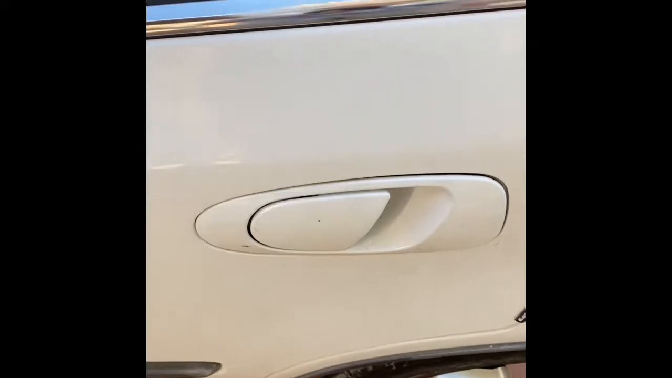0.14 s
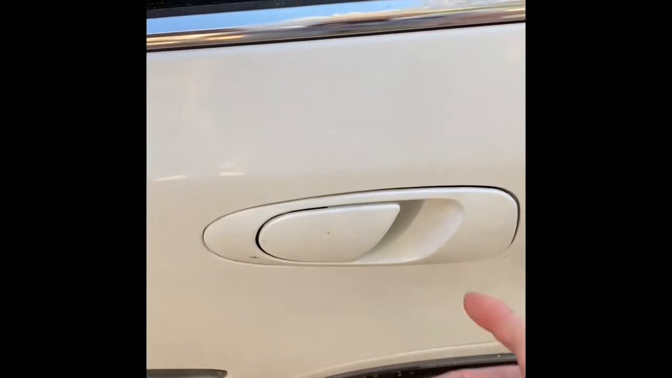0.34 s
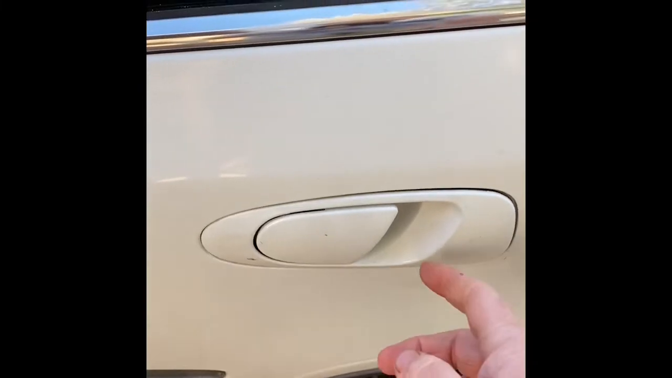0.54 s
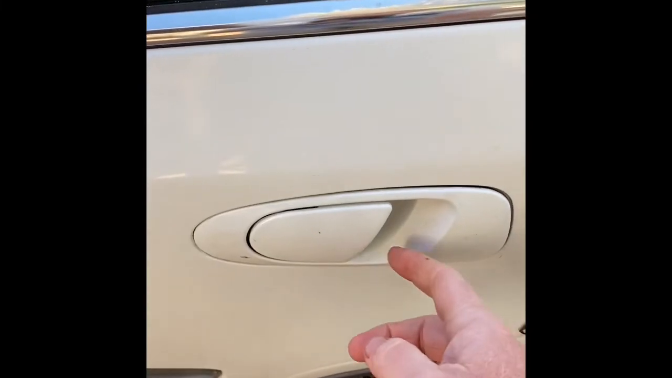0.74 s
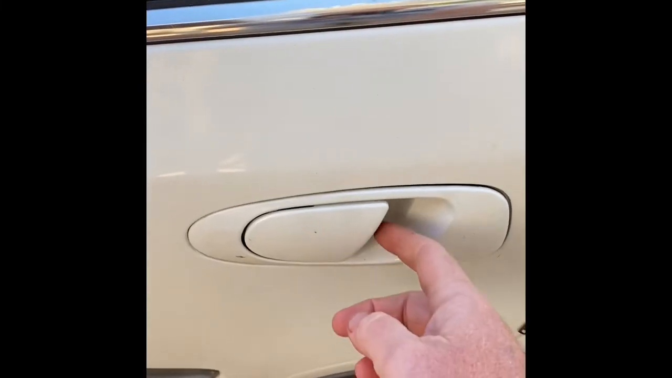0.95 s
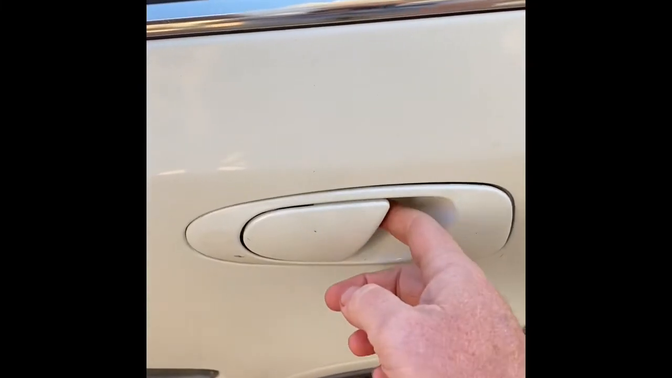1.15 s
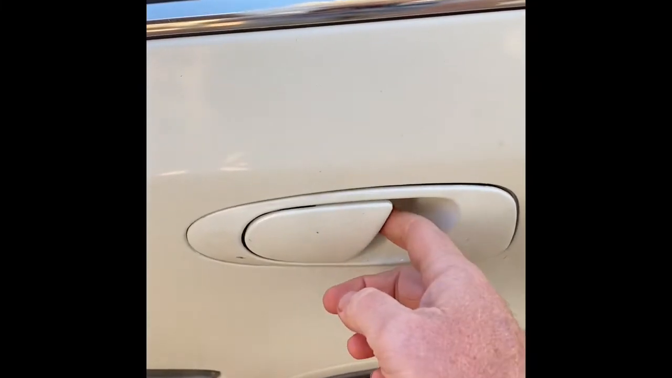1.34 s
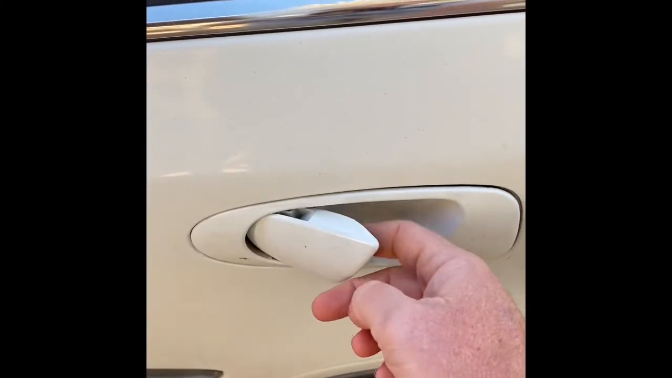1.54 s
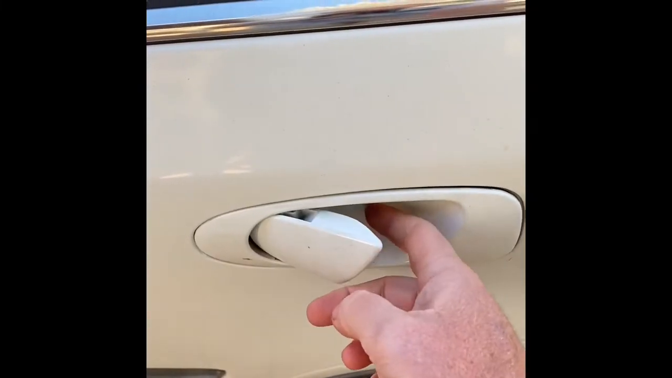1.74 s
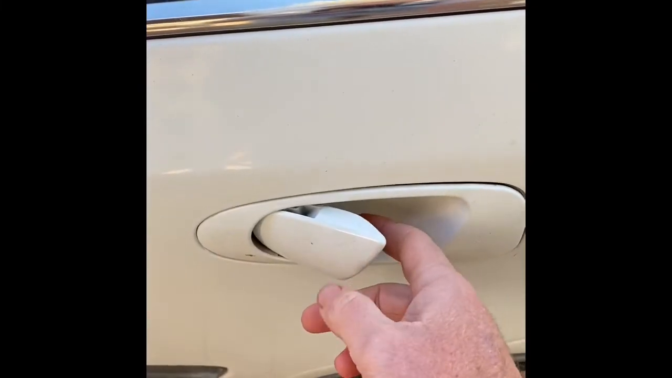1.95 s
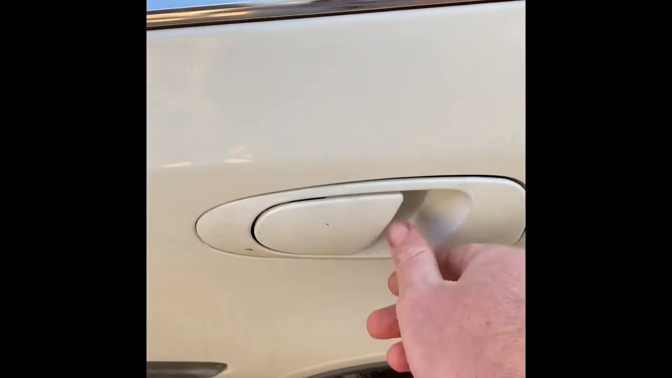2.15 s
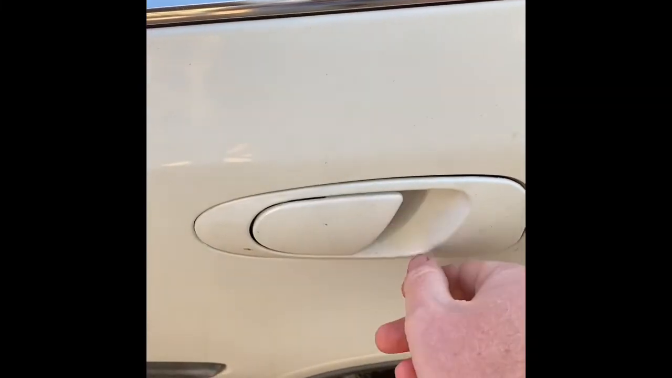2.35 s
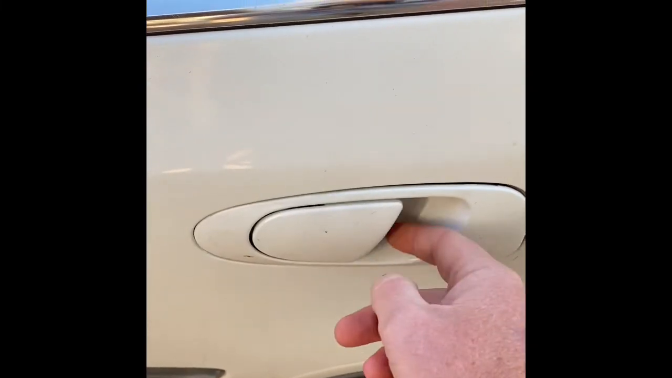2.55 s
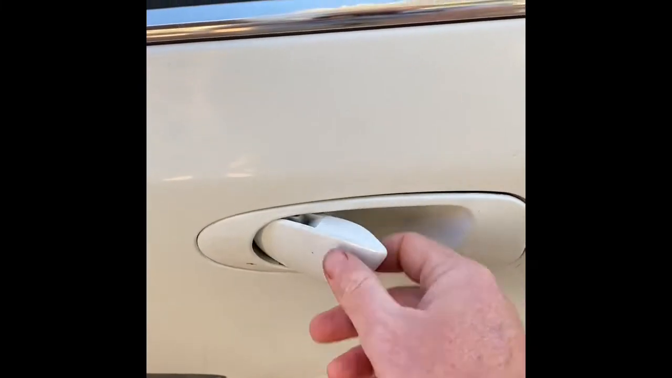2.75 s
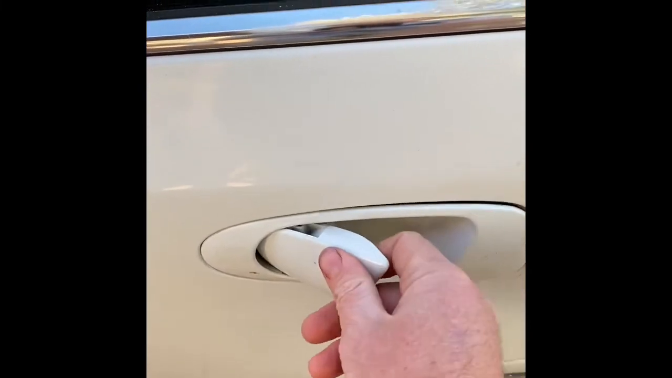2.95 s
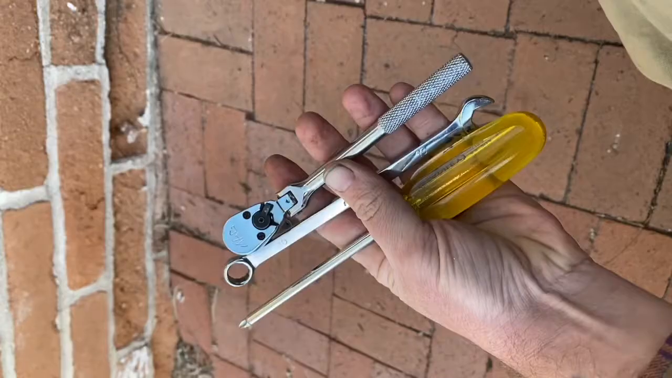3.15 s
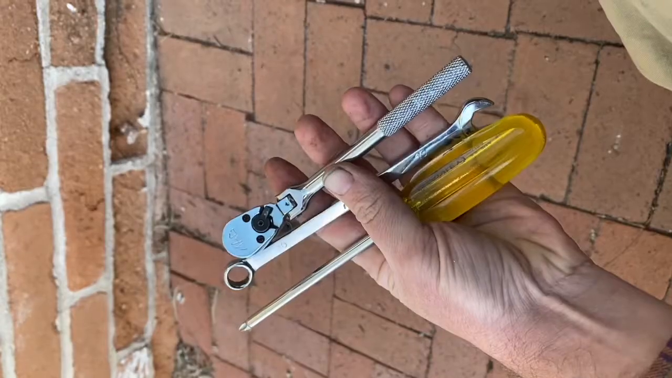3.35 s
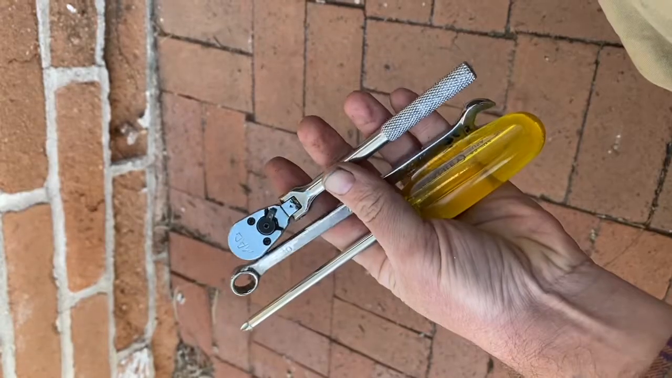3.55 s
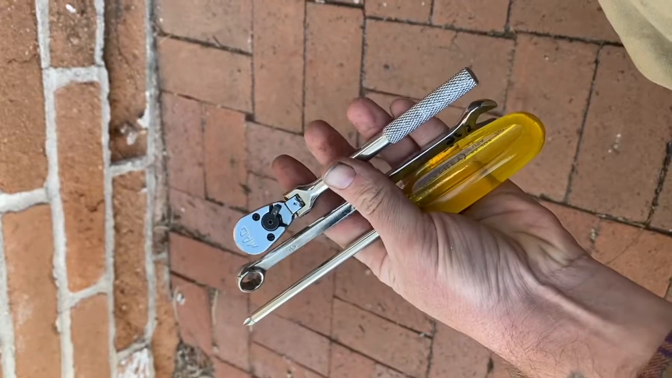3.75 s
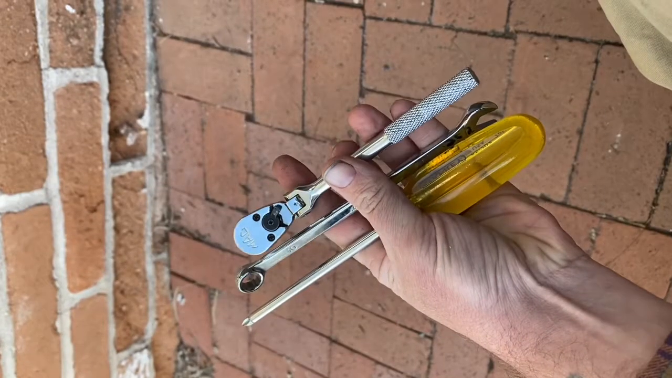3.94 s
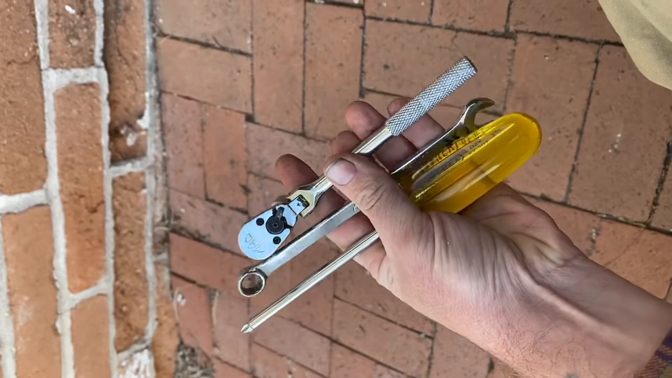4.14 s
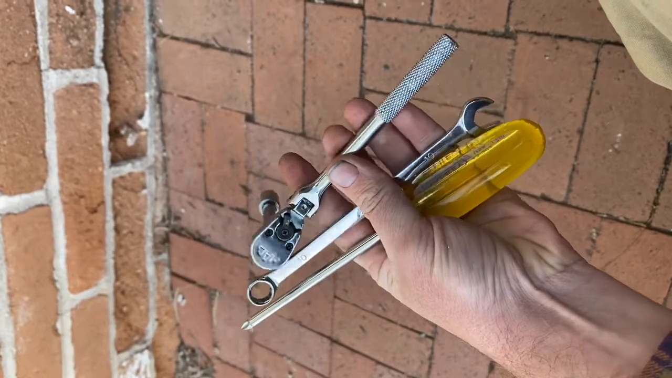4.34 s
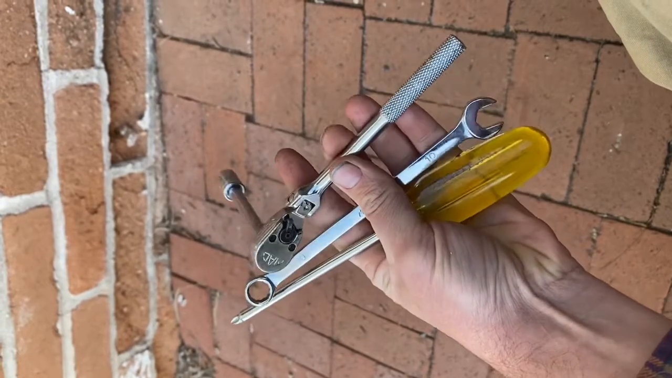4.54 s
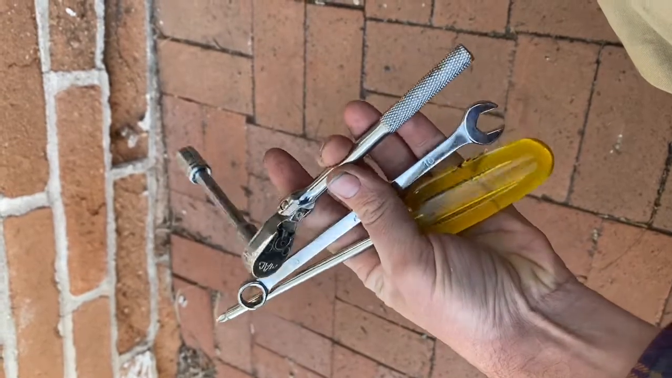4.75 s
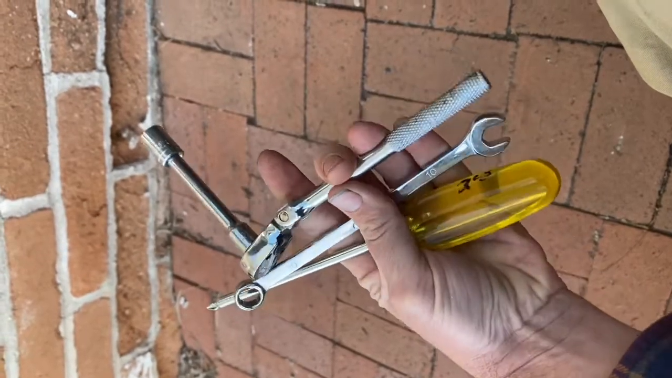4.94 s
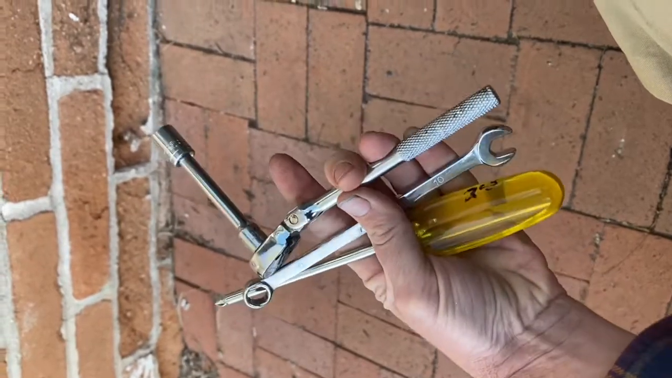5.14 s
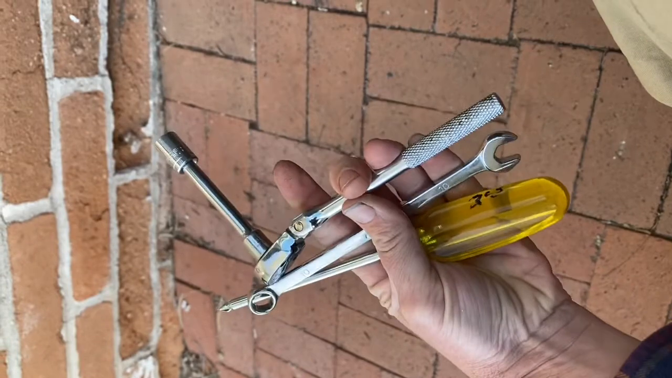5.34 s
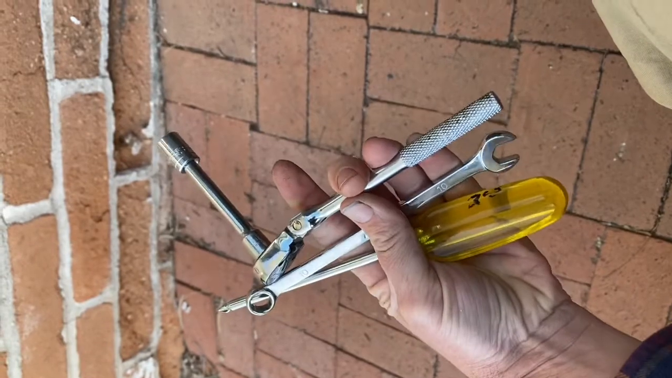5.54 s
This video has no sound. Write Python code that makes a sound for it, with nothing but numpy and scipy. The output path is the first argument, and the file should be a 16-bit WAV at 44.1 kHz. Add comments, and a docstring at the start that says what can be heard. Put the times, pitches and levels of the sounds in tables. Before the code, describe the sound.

Close hand-held microphone outdoors by a car. Fingers reach with faint thuds and skin rub, then the plastic door handle snaps three times, sharp and hollow with panel ring and loose internal rattle, over growing low rumble. An abrupt cut brings a quieter paved yard, where steel tools tick softly in a palm under light wind puffs and a faint far motor.

```python
"""Car door handle, then steel tools in the palm

Outdoors by a car, hand-held microphone: a plastic door handle is pulled and snaps back three times.
Each snap is a filtered crack exciting decaying panel modes and dense cavity noise; latch and loose rods ring.
Grip thuds, deep rumble and skin rub reach the microphone; two thin chirps are far off. After a cut at
3.1 s to a paved yard, tools tick as noise bursts with short steel modes, over light wind and a far motor."""
import sys
import numpy as np
from scipy import signal
from scipy.fft import rfft, irfft
from scipy.io import wavfile
from scipy.ndimage import uniform_filter1d

SR = 44100
rng = np.random.default_rng(int(sys.argv[2]) if len(sys.argv) > 2 else 0)


def transcribe(u):
    """Save the signal u as a 16-bit wav file named by the first command-line argument.

    u: samples, shape (n,) or (channels, n), limited to [-1, 1]; the rate is SR.
    q: integer samples, one column per channel.
    """
    v = np.clip(np.atleast_2d(u).T, -1, 1)
    q = np.round(v * 32767).astype(np.int16)
    wavfile.write(sys.argv[1], SR, q)


N = 250929  # length in samples
CUT_S = 3.097  # from the car to the yard

# Spectra below give relative level per Hz; ring tables give the relative level of each mode.
# Air by the car: f/Hz, level/dB
CAR_AIR = [(88, -30.5), (150, -21), (275, -17.5), (368, -13), (790, -16), (979, -20), (1060, -20.5),
           (2400, -35), (4500, -46.5), (7040, -55), (16000, -72)]
# Air over the paving: f/Hz, level/dB
YARD_AIR = [(59, -12.5), (100, -11.5), (189, -7), (406, -22), (452, -22), (570, -20), (950, -22),
            (1910, -40), (7290, -50), (9020, -58), (11600, -45), (16000, -59.5)]
# Left-right likeness of open air: f/Hz, likeness [-1 to 1]
AIR_LIKENESS = [(60, 1), (290, 0.49), (640, 0), (1400, 0.15), (3100, 0), (7000, 0)]
CAR_AIR_DB, YARD_AIR_DB = -58.5, -54.5

# Thin far chirps: start t/s, length/s, level/dB, level of the inner note relative to the chirp/dB
CHIRPS = [(0.308, 0.39, -68.5, -6), (1.033, 0.4, -68.5, -9.5)]
# Hiss of a chirp: f/Hz, level/dB
CHIRP_SPECTRUM = [(6500, -50), (7800, -14.5), (9000, -1), (10200, -10), (11500, -14.5), (13000, -39)]
# Two syllables of each chirp: centre [share of chirp], length [share of chirp], level/dB
SYLLABLES = [(.22, 0.25, -4), (.6, 0.41, -0.5)]
# The inner note starts late and quickly, then eases slightly: place [share of chirp], gain [1]
NOTE_SHAPE = [(.29, 0), (.36, 1), (.48, 1), (.62, 0.91)]
WHISTLE_HZ, WHISTLE_SAG_HZ, WHISTLE_WAVER_HZ = 5860, 189, 70.2  # start, fall over the chirp, rms waver
NOTE_UNEVEN_DB = 3.5  # rms

# Far motor: t/s, f/Hz, level/dB
MOTOR = [(4.15, 165.3, -76.5), (4.399, 165.1, -68.5), (4.749, 167.2, -66.5), (5.049, 178.4, -67.5),
         (5.2, 178.6, -66.5), (5.35, 183, -80.5)]
# Motor harmonics: multiple [1], relative level/dB
MOTOR_ORDERS = [(1, 3), (2, 3.5), (3, -2), (4, -2.5)]

# Light breeze between the puffs: t/s, level/dB
BREEZE = [(3.1, -70), (3.9, -52), (4.8, -53), (5.69, -62.5)]
# Puffs of wind on the microphone: t of the height/s, length/s, level/dB
GUSTS = [(3.57, 0.096, -42), (3.635, 0.087, -42), (3.875, 0.035, -44), (4.265, 0.066, -43.5),
         (4.325, 0.03, -43.5), (4.725, 0.041, -39), (5.05, 0.077, -41), (5.25, 0.047, -50),
         (5.68, 0.062, -48.5)]

# Deep buffeting of the microphone, by hand or wind: f/Hz, level/dB
DEEP_SPECTRUM = [(15, -38.5), (25, -17.5), (40, -3), (65, 3), (110, -2.5), (160, -9.5), (300, -26),
                 (700, -73.5)]
# Softer rub of the grip: f/Hz, level/dB
GRIP_RUB_SPECTRUM = [(60, -25.5), (140, 0.5), (200, -0.5), (330, -9), (480, -15), (750, -27), (1500, -37),
                     (4000, -82)]
# Unsteady grip, growing as the hand reaches and works the handle: t/s, level/dB
GRIP = [(0.0, -43), (0.2, -58.5), (0.56, -53), (0.85, -45), (1.3, -39.5), (1.6, -37.5), (1.9, -34.5),
        (2.2, -35), (2.45, -34.5), (2.68, -36.5), (3.06, -32)]
# Lurches with a push of the arm: t of the height/s, length/s, level/dB
LURCHES = [(0.04, 0.055, -69), (0.757, 0.048, -38), (1.17, 0.051, -34), (1.48, 0.052, -32.5),
           (2.375, 0.11, -28.5), (2.49, 0.051, -28), (2.785, 0.17, -34.5), (2.955, 0.065, -36),
           (3.04, 0.031, -25.5)]
DEEP_DB, RUB_DB = -1, -7  # over the grip level; the rub figure holds at a firm grip
FIRM_DB, RUB_GROWTH = -35, 2  # firm grip level; dB of rub per dB of grip
RUB_UNEVEN_DB, RUB_CATCH_S = 3.5, 0.0098  # the skin catches and slips on the case
LURCH_RUB_DB = -9.5  # rub relative to a lurch
JOLT_DEEP_DB, JOLT_RUB_DB, JOLT_RISE_S = -38.5, -29.5, 0.031  # each snap jolts the arm

# Handling bumps: t/s, thud peak level/dB, tap level/dB, starting f/Hz
BUMPS = [(0.584, -43, -75, 464), (1.084, -32, -46, 650), (1.132, -32, -65, 400), (1.266, -39, -35, 770),
         (1.445, -29.5, -35, 620), (1.567, -29.5, -39.5, 615), (1.608, -32.5, -48, 610),
         (1.69, -30, -38.5, 574), (1.723, -28.5, -40.5, 713), (1.754, -30, -39, 776),
         (1.755, -22, -58.5, 240), (1.782, -22.5, -60, 322), (1.852, -36, -52.5, 620),
         (1.865, -22, -53, 464), (1.892, -33, -30, 700), (1.917, -26.5, -47, 395),
         (1.929, -25.5, -45.5, 409), (1.974, -33, -33, 700), (2.307, -37, -52, 740),
         (2.324, -27.5, -35.5, 560), (2.379, -26.5, -51, 380), (2.446, -28.5, -33.5, 490),
         (2.458, -25.5, -35, 494), (2.48, -23, -32.5, 692), (2.719, -28.5, -38, 418),
         (2.889, -28.5, -54, 520), (3.009, -27, -46, 383)]
# Soft tap on top of a bump: f/Hz, level/dB
TAP_SPECTRUM = [(150, -13.5), (400, 0.5), (650, -1.5), (950, -19.5), (1500, -39), (3000, -75), (6000, -89)]
CREAKS_PER_S, CREAK_DB, CREAK_SPREAD_DB = 44, -3, 3  # small bumps: about this rate; dB over grip, +/- dB
CREAK_HZ, CREAK_SPREAD_OCT = 418.3, 0.74  # pitch, +/- octaves
CREAK_TAP_DB = -15  # tap level against the thud level
THUD_FALL = 0.24  # share of its pitch a thud sinks towards
THUD_GLIDE_CYCLES, THUD_CYCLES = 3.3, 13  # glide and 60 dB decay, so low thuds last longer

# Strokes of skin and sleeve: start t/s, length/s, level/dB, treble tilt/(dB per octave), rise [share of length]
RUBS = [(0.0, 0.32, -63, -0.5, 0.018), (0.631, 0.14, -61, -2.5, 0.12), (0.7, 0.64, -72.5, 1.5, 0.061),
        (2.324, 0.27, -68.5, 3.5, 0.28), (2.926, 0.2, -66.5, 2.5, 0.15), (4.061, 0.14, -71, 4.5, .4),
        (4.777, 0.21, -66, -2.5, 0.17), (5.372, 0.61, -64.5, -2.5, 0.77)]
# Hiss of skin and sleeve: f/Hz, level/dB
RUB_SPECTRUM = [(700, -20.5), (1700, 0), (2600, -4.5), (3500, -11), (4600, -12.5), (5400, -7.5),
                (7000, -21), (11000, -14.5), (16000, -21.5)]
# Resonances colouring the rub on the door: f/Hz, width/Hz, added level relative to the hiss/dB
DOOR_RUB = [(2570, 130, 6), (3460, 130, 7.5), (4460, 200, 7)]
# The same on the tools: f/Hz, width/Hz, added level relative to the hiss/dB
TOOL_RUB = [(2080, 140, 1), (2770, 42, 3), (3800, 140, 11)]

# Ratchet joint dragging as its bar swings out
DRAG_START_S, DRAG_LENGTH_S = 4.37, 0.4
DRAG_HZ, DRAG_WIDTH_HZ, DRAG_DB = 2086, 18, -77.5

# Tool contacts: t/s, tick level/dB, tick centre f/Hz, half-width [octaves], ratchet level/dB, wrench level/dB
TICKS = [(3.329, -62, 6000, 1, -71, -81.5), (3.942, -38.5, 5300, 0.35, -74, -77),
         (3.961, -61, 4900, .45, -84, -73), (3.9820, -40.5, 4630, 0.95, -42, -39),
         (3.9868, -51, 5000, 0.92, -44, -59), (4.3124, -44.5, 3500, 0.68, -39.5, -60),
         (4.369, -51.5, 2600, 0.12, -80, -90), (4.442, -60, 3100, 0.52, -84, -88),
         (4.742, -46, 4940, 0.44, -81, -80.5), (5.543, -59, 7500, 0.58, -81, -85),
         (5.578, -53, 9020, 0.77, -64.5, -85)]
# Hand-damped ratchet modes: f/Hz, level/dB, t60/s
RATCHET = [(2580, -14.5, 0.035), (3320, -14, 0.072), (3997, -17.5, 0.06), (4880, -17, 0.04),
           (6860, -15, .025), (7130, 2.5, 0.043), (10350, -16, .03), (11400, -3, 0.052)]
# Hand-damped wrench modes: f/Hz, level/dB, t60/s
WRENCH = [(3806, 1.5, 0.052), (6430, -7, 0.04), (10060, -11.5, 0.078), (13825, -16, 0.085)]
CHATTER_DB, CHATTER_S = 3, 0.0011  # the tools keep touching while they ring

# Handle strikes: t/s, force level/dB, treble tilt/(dB per octave), relative panel ring level/dB
STRIKES = [(1.3399, -13.5, 2.5, -15), (1.3412, -4, -2.5, -18.5), (1.3477, -20, 3.5, -29),
           (1.3522, -17.5, 2.5, -15.5), (2.019, -3, 1, -19), (2.0220, -6, 3, -31), (2.0253, -5.5, 1.5, -22),
           (2.0394, -23, -7, -14.5), (2.057, -28, -0.5, -14), (2.0949, -22, 2.5, -13.5),
           (2.1024, -28.5, 2.5, -10.5), (2.119, -29.5, 1.5, -12.5), (2.5597, -39.5, -5, -10),
           (2.579, -9, -0.5, -17), (2.5806, -4.5, 0.5, -19.5), (2.588, -17, -1, -10),
           (2.6074, -24, -4, -15.5), (2.8149, -23, -3, -12), (2.8288, -36, 0, -9.5),
           (2.839, -39.5, -0.5, -6.5), (3.0221, -30.5, -3.5, -15)]
# Scrape swelling around each snap: start t/s, end t/s, level at the end/dB
SCRAPES = [(1.318, 1.347, -30), (1.983, 2.036, -25), (2.551, 2.587, -25.5)]
# First crack of the plastic: f/Hz, level/dB
CRACK = [(100, -22.5), (400, -10.5), (750, 2), (1900, 5.5), (3200, -2.5), (4200, -11), (5300, -10),
         (6400, -3), (7600, -26.5), (10500, -14), (13000, -35), (16000, -41.5)]
# Door panel and handle modes: f/Hz, level/dB, t60/s
PANEL = [(162.8, -18.5, 0.37), (335, -10, 0.1), (376, -8.5, 0.12), (520, -6.5, .13), (566, -8.5, .18),
         (603, -1.5, 0.24), (649, -0.5, 0.11), (700, -4.5, 0.062), (762, -1.5, 0.091), (857, -1.5, .12),
         (960, -10, 0.061), (990, -5, .16), (1033, -8.5, 0.14), (1122.3, -3.5, 0.13), (1240, -8.5, 0.066),
         (1276, -9, .09), (1400, -12.5, .06), (1536, -12.5, .1), (1624, -8.5, .12), (1805, -5.5, 0.095),
         (1930, -4.5, .08), (2003, -9, .085), (2208, -10, .1), (2670, -9, 0.042), (3120, -12.5, 0.064),
         (3270, -15.5, 0.095), (3580, -16, 0.031), (3800, -17.5, .06)]
# Dense ringing of the door cavity: f/Hz, level/dB, t60/s
CAVITY = [(90, -19.5, 0.12), (238, -7.5, 0.47), (400, 1, 0.16), (740, 1.5, 0.11), (1390, -0.5, 0.17),
          (2040, -4, 0.13), (3280, -14, 0.04), (5900, -20, 0.058), (7460, -33.5, 0.057),
          (10600, -26.5, 0.077), (13250, -38, 0.12), (16000, -44, .1)]
CAVITY_SPECTRUM = [row[:2] for row in CAVITY]
RATTLE_DB, RATTLE_S = 4.5, 0.003  # loose parts make the dense ringing uneven
# The handle meets its stop squarely: t/s, level/dB
STOP_HITS = [(1.3412, -20), (2.5805, -14.5)]
# Short, bright stop modes: f/Hz, level/dB, t60/s
STOP = [(5440, -8, 0.01176), (6380, 2, 0.02)]
# The latch linkage clacks: t/s, level/dB
LATCH_HITS = [(2.0245, -30), (2.0954, -41.5), (2.1022, -42), (2.1198, -44.5), (2.588, -35)]
# Steel latch modes: f/Hz, level/dB, t60/s
LATCH = [(1730, -0.5, .075), (3240, -7, .04), (4430, -11, 0.036), (4900, -9, .07), (5330, -4.5, 0.043),
         (6070, -7.5, .08)]
# The hardest snap knocks the door skin: t/s, level/dB
SKIN_HITS = [(2.036, -16.5)]
# Low door skin modes: f/Hz, level/dB, t60/s
SKIN = [(276.6, -7, 0.097), (380, 1, 0.092), (520, -5.5, 0.067)]
# Loose rods knock inside the door after a snap: t/s, level/dB, f/Hz
ROD_KNOCKS = [(1.364, -24, 645), (1.377, -26, 968), (1.407, -32.5, 960), (2.039, -26.5, 597),
              (2.052, -33, 990), (2.604, -20.5, 660), (2.619, -25.5, 863), (2.637, -29, 960)]
ROD_RISE_S, ROD_T60_S = 0.0062, 0.1
ROD_SECOND_RATIO, ROD_SECOND_DB = 0.9, -5  # second mode against the first
# Valleys between the resonances of the handle's shell: f/Hz, width/Hz, level/dB
SHELL_DIPS = [(1440, 110, -3.5), (2100, 60, -5.5), (2400, 76, -6), (2840, 100, -10), (3380, 80, -8.5)]
# Left-right likeness of the door sound: f/Hz, likeness [-1 to 1]
DOOR_LIKENESS = [(100, 0.99), (400, 1), (1400, 0.96), (4000, 0.45), (15000, 0.89)]
# Left minus right at the microphone: f/Hz, level/dB
DOOR_LEAN = [(100, -3), (380, -0.5), (700, -5.5), (1300, -3), (2400, 0), (15000, 0.5)]
# Phase by which left leads right: f/Hz, phase/rad
LEFT_LEAD = [(100, -1.5), (860, 0.65), (2400, 0.5), (4900, 0.5), (7200, 4.5), (10300, 5.5), (13000, 9),
             (15500, 13)]
BEND_S, BEND_HZ = 0.0011, 1050  # travel time of a bending wave through the panel, at this pitch

TREBLE_EDGE_HZ = 16100


def amp(db):
    """Decibels to gain."""
    return 10 ** (np.asarray(db) / 20)


def unit(x):
    """Scales to rms 1."""
    return x / np.sqrt(np.mean(x ** 2) + 1e-20)


def read(points, hz):
    """Reads an (f/Hz, value) table on a log-frequency axis."""
    f, value = np.transpose(points)
    return np.interp(np.log(hz + 1), np.log(f + 1), value)


def over_time(points, t):
    """Reads a (place, value) table along a straight axis."""
    return np.interp(t, *np.transpose(points))


def bins(size):
    """Frequencies of a spectrum of this many samples."""
    return np.fft.rfftfreq(size, 1 / SR)


def add(mix, s, sound):
    """Mixes a sound in at time s."""
    part = mix[:, max(round(s * SR), 0):][:, :sound.shape[-1]]
    part += sound[..., :part.shape[-1]]


def noise(spectrum, likeness, size):
    """Stereo noise of rms 1; the mid-side balance sets the left-right likeness."""
    hz = bins(size)
    mid, side = rfft(rng.standard_normal((2, size)))
    same = np.clip(read(likeness, hz), -1, 1)
    mid, side = mid * np.sqrt(1 + same), side * np.sqrt(1 - same)
    return unit(irfft(np.array([mid + side, mid - side]) * amp(read(spectrum, hz)), size))


def wobble(seconds, size):
    """Smooth random drift of rms 1 that changes over the given time."""
    width = max(round(seconds * SR), 2)
    once = uniform_filter1d(rng.standard_normal(size), size=width)
    return unit(uniform_filter1d(once, size=width // 2))


def swells(events, t):
    """Power of smooth swells, each given as (height, length, level/dB)."""
    return sum(amp(db) ** 2 * np.exp(-2 * np.pi * ((t - s) / length) ** 2) for s, length, db in events)


def fade(t, t60):
    """Exponential decay by 60 dB in t60."""
    return np.exp(-np.log(1000) * t / max(t60, 1e-3))


def impulse(db, size=2048):
    """Minimum-phase click with the given spectrum in dB."""
    log_gain = np.log(amp(np.r_[db, db[-2:0:-1]]))
    return np.fft.ifft(np.exp(np.conj(signal.hilbert(log_gain)))).real[:size]


def tilted(x, tilt_db, pivot_hz, top_hz=9000):
    """A causal slope in dB per octave, level below 300 Hz and above top_hz."""
    slope = impulse(tilt_db * np.log2(np.clip(bins(size=2048), 300, top_hz) / pivot_hz))
    return signal.fftconvolve(x, slope[None], axes=1)


def ring(modes, t, likeness, scatter_db):
    """Decaying modes; each blow meets them a little differently, and each ear at its own phase."""
    hz, db, t60 = np.transpose(modes)
    phase = rng.uniform(0, 2 * np.pi, len(hz))
    level_db = db + scatter_db * rng.standard_normal(len(hz))
    turn = rng.choice([-1, 1], len(hz))
    apart = turn * np.arccos(np.clip(read(likeness, hz), -1, 1)) / 2
    ears = np.array([[1], [-1]])
    out = 0
    for k in range(len(hz)):
        wave = np.sin(2 * np.pi * hz[k] * t + phase[k] + ears * apart[k])
        out = out + amp(level_db[k]) * fade(t, t60[k]) * wave
    return out


def air():
    """Steady air in each place; the level dips briefly at the cut."""
    t = np.arange(N) / SR
    leave = np.clip((CUT_S - t) / 0.033, 0, 1)
    arrive = np.clip((t - CUT_S) / 0.04, 0, 1) ** 2
    car = amp(CAR_AIR_DB) * noise(CAR_AIR, AIR_LIKENESS, size=N) * leave
    return car + amp(YARD_AIR_DB) * noise(YARD_AIR, AIR_LIKENESS, size=N) * arrive


def chirps():
    """Thin far chirps: two syllables of hiss around a sagging, wavering whistle."""
    out = np.zeros((2, N))
    for s, length, db, note_db in CHIRPS:
        size = round(length * SR)
        share = np.linspace(0, 1, size)
        hiss = noise(CHIRP_SPECTRUM, [(9000, 0.021)], size=SR)[:, :size]
        hiss = hiss * np.sqrt(swells(SYLLABLES, share))
        note = over_time(NOTE_SHAPE, share) * amp(NOTE_UNEVEN_DB * wobble(0.004, size=SR)[:size])
        pitch = WHISTLE_HZ - WHISTLE_SAG_HZ * share + WHISTLE_WAVER_HZ * wobble(0.0012, size=SR)[:size]
        whistle = np.sin(2 * np.pi * np.cumsum(pitch) / SR)
        add(out, s, amp(db) * (hiss + amp(note_db) * whistle * note))
    return out


def motor():
    """Far motor: a few harmonics of one slightly unsteady turning speed."""
    t = np.arange(N) / SR
    s, hz, db = np.transpose(MOTOR)
    turns = np.cumsum(np.interp(t, s, hz) * (1 + 0.011 * wobble(0.028, size=N))) / SR
    hum = sum(amp(level_db) * np.sin(2 * np.pi * k * turns) for k, level_db in MOTOR_ORDERS)
    return hum * amp(np.interp(t, s, db, left=-120, right=-120))


def wind():
    """A light breeze and a few puffs buffet the microphone in the yard."""
    t = np.arange(N) / SR
    power = amp(over_time(BREEZE, t)) ** 2 + swells(GUSTS, t)
    return np.sqrt(power) * noise(DEEP_SPECTRUM, [(60, 0.88), (300, 1.0)], size=N) * (t > CUT_S)


def handling():
    """Deep buffeting and softer rubbing follow the grip, swell with each lurch and jump after each snap."""
    t = np.arange(N) / SR
    grip_db, lurch = over_time(GRIP, t), swells(LURCHES, t)
    since = [np.maximum(t - end + JOLT_RISE_S / 2, 0) / JOLT_RISE_S for start, end, db in SCRAPES]
    jolt = sum(u * np.exp(1 - u) for u in since) ** 2
    deep_power = amp(grip_db + DEEP_DB) ** 2 + lurch + amp(JOLT_DEEP_DB) ** 2 * jolt
    rub_db = FIRM_DB + RUB_DB + RUB_GROWTH * (grip_db - FIRM_DB)
    rub_power = amp(rub_db + RUB_UNEVEN_DB * wobble(RUB_CATCH_S, size=N)) ** 2
    rub_power = rub_power + amp(LURCH_RUB_DB) ** 2 * lurch + amp(JOLT_RUB_DB) ** 2 * jolt
    deep = np.sqrt(deep_power) * noise(DEEP_SPECTRUM, [(60, 0.97), (400, 0.94)], size=N)
    rub = np.sqrt(rub_power) * noise(GRIP_RUB_SPECTRUM, [(100, 0.84), (600, 0.79)], size=N)
    return (deep + rub) * np.clip((CUT_S - t) / 0.041, 0, 1)


def thud(t, pitch_hz):
    """A soft knock that falls quickly in pitch as it dies."""
    cycles = t * pitch_hz
    hz = pitch_hz * (THUD_FALL + (1 - THUD_FALL) * np.exp(-cycles / THUD_GLIDE_CYCLES))
    envelope = (1 - np.exp(-cycles / 2.0)) ** 2 * fade(cycles, THUD_CYCLES)
    wave = np.sin(2 * np.pi * (np.cumsum(hz) / SR + rng.random())) * envelope
    return wave / abs(wave).max()


def bumps():
    """Knocks of the grip, each a thud and a soft tap; small ones fall at random, louder as the grip rises."""
    out, t = np.zeros((2, N)), np.arange(SR // 10) / SR
    tap = impulse(read(TAP_SPECTRUM, bins(size=2048)))
    tap = tap / abs(tap).max()
    place, strength, pitch = rng.random((round(CREAKS_PER_S * CUT_S), 3)).T
    times = place * GRIP[-1][0]
    small_db = over_time(GRIP, times) + CREAK_DB + CREAK_SPREAD_DB * (2 * strength - 1)
    small_hz = CREAK_HZ * 2 ** (CREAK_SPREAD_OCT * (2 * pitch - 1))
    small = list(zip(times, small_db, small_db + CREAK_TAP_DB, small_hz))
    for s, db, tap_db, pitch_hz in list(BUMPS) + small:
        add(out, s, amp(db) * thud(t, pitch_hz))
        # one touch and a little rattle
        contact = 0.088 * rng.standard_normal((2, len(t))) * fade(t, 0.064) + 1.6 * (t == 0)
        add(out, s + 0.0019, amp(tap_db) * signal.fftconvolve(contact, tap[None], axes=1))
    return out


def rubbing():
    """Skin and cloth slide in soft, grainy strokes, coloured by what they touch."""
    out = np.zeros((2, N))
    for s, length, db, tilt_db, rise in RUBS:
        size = round(np.clip(length, 0.02, 1) * SR)
        stroke = np.interp(np.linspace(0, 1, size), [0, np.clip(rise, 0.02, 0.98), 1], [0, 1, 0])
        grain_db = 2.2 * unit(uniform_filter1d(rng.standard_normal(SR), size=200))
        plain = noise(RUB_SPECTRUM, [(1000, 0.17), (8000, 0.03)], size=SR)
        plain = tilted(plain, tilt_db, pivot_hz=3000)[:, :SR]
        coloured = plain
        for hz, width, peak_db in (DOOR_RUB if s < CUT_S else TOOL_RUB):
            peak = signal.iirpeak(hz, hz / width, fs=SR)
            coloured = coloured + amp(peak_db) * signal.lfilter(*peak, plain)
        add(out, s, (unit(coloured) * amp(db + grain_db))[:, :size] * stroke)
    return out


def joint():
    """Steel drags on steel: a faint, narrow singing that starts quickly and fades."""
    out, u = np.zeros((2, N)), np.linspace(0, 1, round(DRAG_LENGTH_S * SR))
    peak = signal.iirpeak(DRAG_HZ, DRAG_HZ / DRAG_WIDTH_HZ, fs=SR)
    note = signal.lfilter(*peak, rng.standard_normal(SR))[:len(u)]
    add(out, DRAG_START_S, amp(DRAG_DB) * unit(note) * np.minimum(u / 0.05, 1) * (1 - u))
    return out


def tools():
    """Steel touches steel: a dry tick and a short, rough ring that the palm damps."""
    out, t = np.zeros((2, N)), np.arange(SR // 6) / SR
    likeness, hz = [(3000, 0.4), (7000, 0.31), (12000, 0.39)], bins(len(t))
    attack = np.minimum(t / 0.00073, 1)
    tick_decay = fade(t, 0.0089) + amp(-22.0) * fade(t, 0.1)
    for s, tick_db, centre_hz, octaves, ratchet_db, wrench_db in TICKS:
        offset = np.log2((hz + 1) / centre_hz) / octaves
        spectrum = np.c_[hz, -10 * np.log10(1 + offset ** 6)]
        add(out, s, amp(tick_db) * noise(spectrum, likeness, size=len(t)) * tick_decay * attack)
        steel = amp(ratchet_db) * ring(RATCHET, t, likeness, scatter_db=2)
        steel = steel + amp(wrench_db) * ring(WRENCH, t, likeness, scatter_db=0.5)
        add(out, s, steel * attack * amp(CHATTER_DB * wobble(CHATTER_S, size=len(t))))
    # thin bars radiate little bass
    return signal.sosfilt(signal.butter(4, 2000, "highpass", fs=SR, output="sos"), out)


def scrapes():
    """A short scrape of noise grows around each snap and stops shortly after its crack."""
    out = np.zeros((2, N))
    for start, end, db in SCRAPES:
        size = max(round((end - start) * SR), 64)
        scrape = noise(CAVITY_SPECTRUM, DOOR_LIKENESS, size=SR // 4)[:, :size]
        growth = np.linspace(0, 1, scrape.shape[1]) ** 1.4
        add(out, start, scrape * amp(db) * growth)
    return out


def rods():
    """Loose rods bump softly against the door, each ringing with two close modes."""
    out, t = np.zeros((2, N)), np.arange(SR // 2) / SR
    for s, db, pitch_hz in ROD_KNOCKS:
        modes = [(pitch_hz, 0, ROD_T60_S), (pitch_hz * ROD_SECOND_RATIO, ROD_SECOND_DB, ROD_T60_S)]
        knock = ring(modes, t, DOOR_LIKENESS, scatter_db=0.5) * np.minimum(t / ROD_RISE_S, 1)
        add(out, s, amp(db) * knock)
    return out


def door_parts():
    """Stop, steel latch and door skin each ring with their own modes when hit."""
    out, t = np.zeros((2, N)), np.arange(SR // 2) / SR
    for hits, modes in (STOP_HITS, STOP), (LATCH_HITS, LATCH), (SKIN_HITS, SKIN):
        for s, db in hits:
            body = ring(modes, t, DOOR_LIKENESS, scatter_db=3.5)
            add(out, s, amp(db) * body * np.minimum(t / 0.00034, 1))
    return out


def cavity(t, early_db, early_t60):
    """Dense door resonances: a quick clatter, then each band dies at its own speed."""
    spectrum = rfft(noise(CAVITY_SPECTRUM, DOOR_LIKENESS, size=len(t)))
    centres, out = [row[0] for row in CAVITY], 0
    for share, row in zip(np.eye(len(CAVITY)), CAVITY):
        band = irfft(spectrum * read(np.c_[centres, share], bins(len(t))), len(t))
        out = out + band * (fade(t, row[2]) + amp(early_db) * fade(t, early_t60))
    return out


def strikes():
    """The handle cracks against its stop and sets the panel and cavity ringing."""
    out, t = np.zeros((2, N)), np.arange(SR // 2) / SR
    crack = impulse(read(CRACK, bins(size=2048)))
    crack = crack / abs(crack).max()
    hollow = amp(-6.0) * cavity(t, early_db=3.0, early_t60=0.027)  # one door answers every blow
    for s, force_db, tilt_db, ring_db in STRIKES:
        # diffuse echo from the ground and walls
        echo = amp(-14.5) * noise(CAVITY_SPECTRUM, AIR_LIKENESS, size=len(t)) * fade(t, 0.32)
        dense = (hollow + echo) * amp(RATTLE_DB * wobble(RATTLE_S, size=len(t)))
        body = ring(PANEL, t, DOOR_LIKENESS, scatter_db=2.0) + dense
        body = body * amp(ring_db) * (1 - np.exp(-t / 0.00011))
        add(body, 0, crack)
        add(out, s, amp(force_db) * tilted(body, tilt_db, pivot_hz=1650))
    return out


def shell(x):
    """The plastic shell passes its own resonances and swallows what lies between them."""
    hz, db = bins(size=2048), 0
    for dip_hz, width, depth_db in SHELL_DIPS:
        db = db + depth_db * np.exp(-((hz - dip_hz) / width) ** 2)
    return signal.oaconvolve(x, impulse(db)[None], axes=1)[:, :N]


def handle():
    """Door sounds pass the shell and panel, whose bending waves carry low notes more slowly."""
    out, hz = shell(strikes() + door_parts() + rods() + scrapes()), bins(N)
    bending = np.exp(-2j * np.pi * 2 * BEND_S * np.sqrt(hz * BEND_HZ))
    left = amp(read(DOOR_LEAN, hz) / 2) * np.exp(0.5j * read(LEFT_LEAD, hz))
    return irfft(rfft(out) * bending * np.array([left, 1 / left]), N) * (np.arange(N) / SR < CUT_S)


def scene():
    """All sources at the microphone, background first."""
    background = air() + chirps() + motor() + wind()
    contact = handling() + bumps() + rubbing()
    return background + contact + joint() + tools() + handle()


def record(dry):
    """The microphone input cuts the deepest rumble and the treble above its edge."""
    dry = signal.sosfilt(signal.butter(2, 32, "highpass", fs=SR, output="sos"), dry)
    lowpass = signal.firwin(511, TREBLE_EDGE_HZ, window=("kaiser", 9), fs=SR)
    return signal.oaconvolve(dry, lowpass[None], "same")


dry = scene()
out = record(dry)
transcribe(out)
```